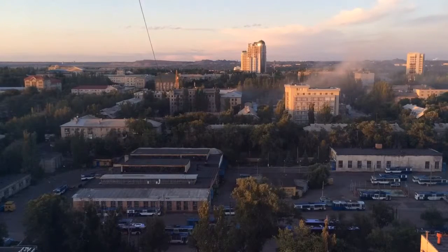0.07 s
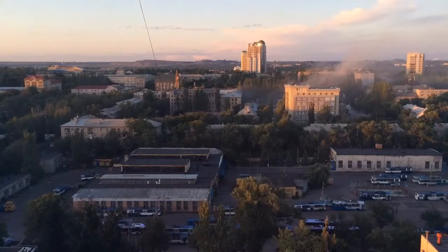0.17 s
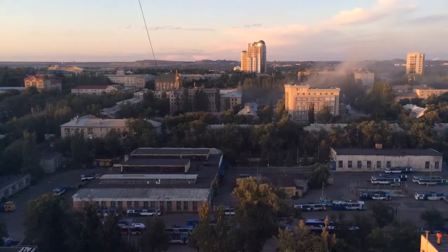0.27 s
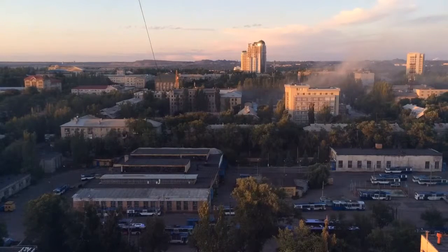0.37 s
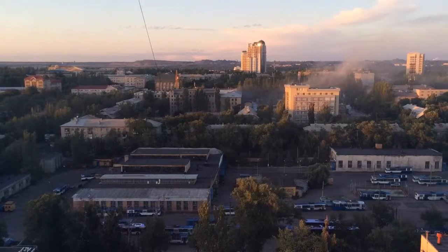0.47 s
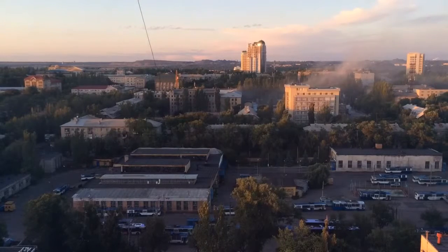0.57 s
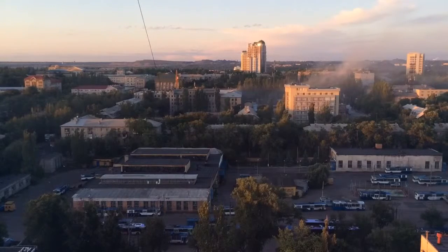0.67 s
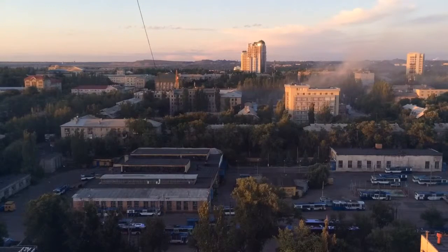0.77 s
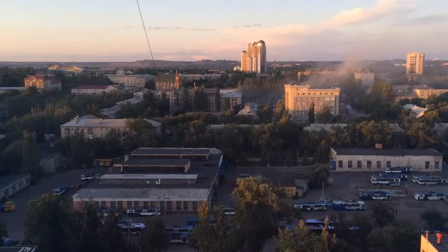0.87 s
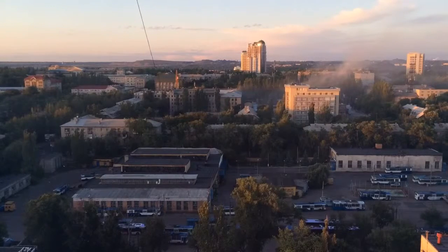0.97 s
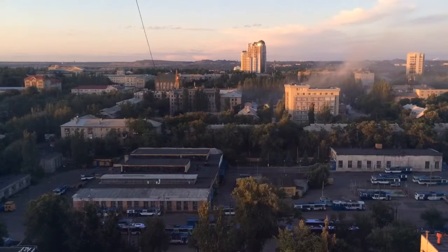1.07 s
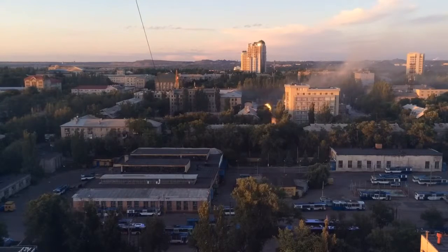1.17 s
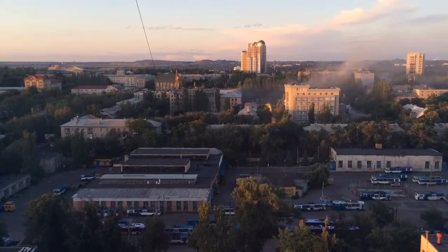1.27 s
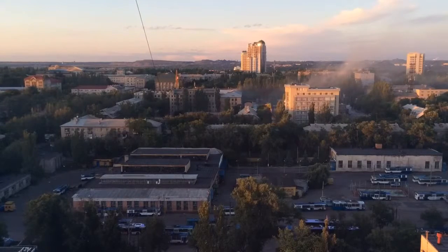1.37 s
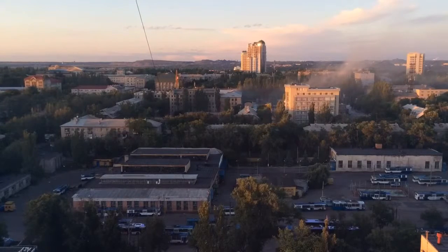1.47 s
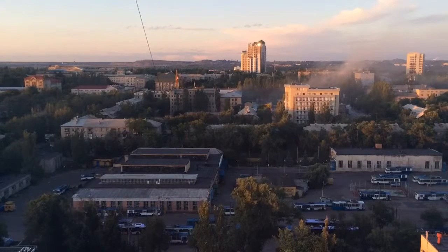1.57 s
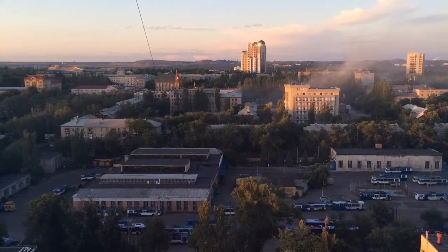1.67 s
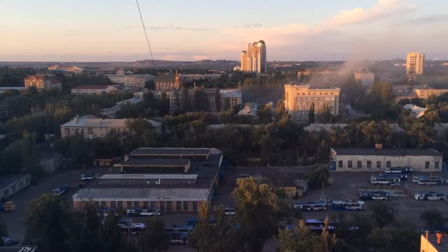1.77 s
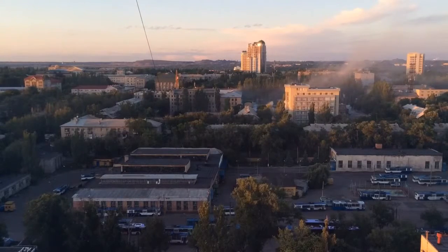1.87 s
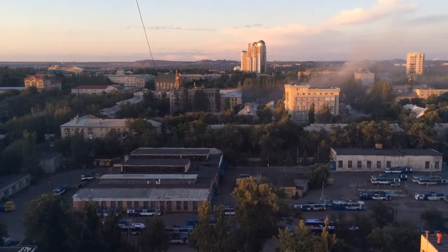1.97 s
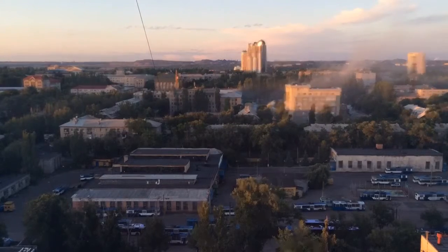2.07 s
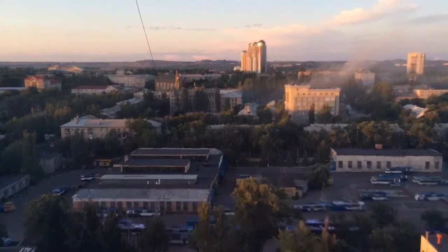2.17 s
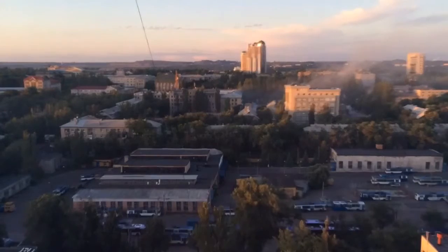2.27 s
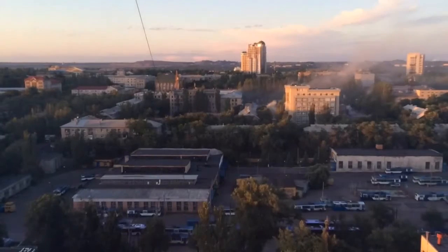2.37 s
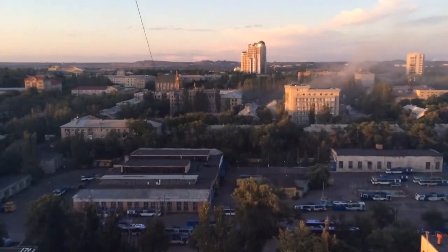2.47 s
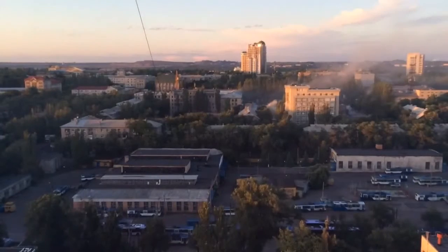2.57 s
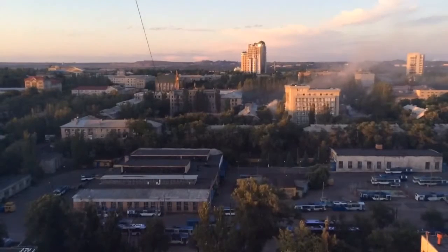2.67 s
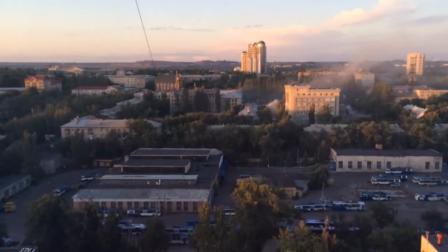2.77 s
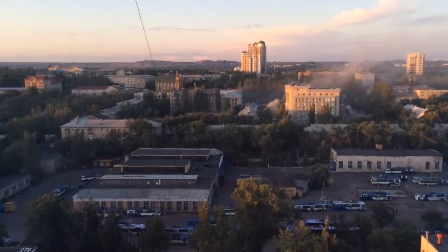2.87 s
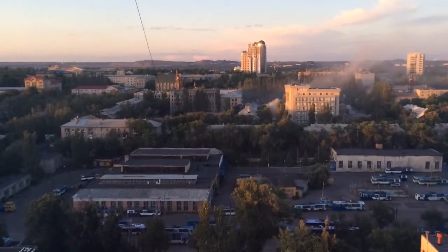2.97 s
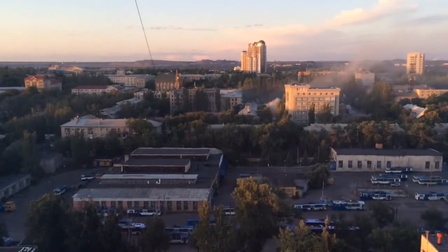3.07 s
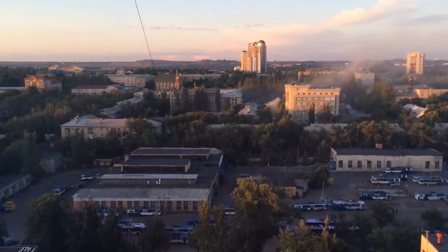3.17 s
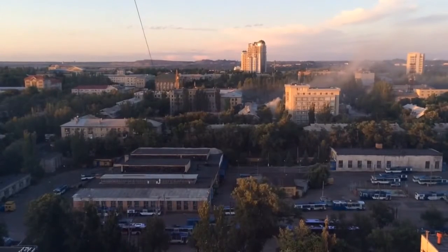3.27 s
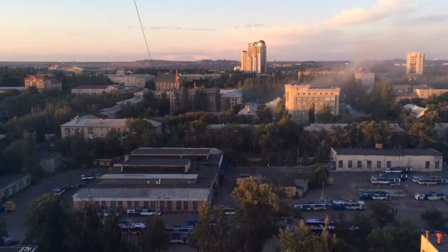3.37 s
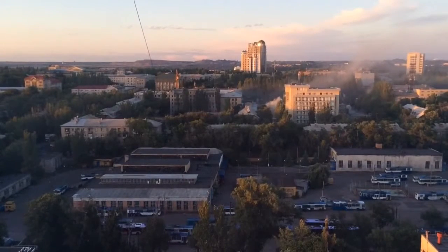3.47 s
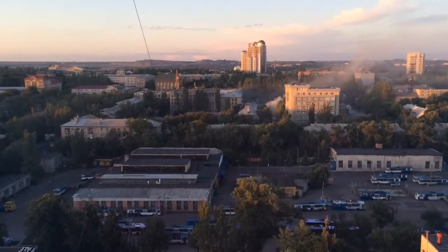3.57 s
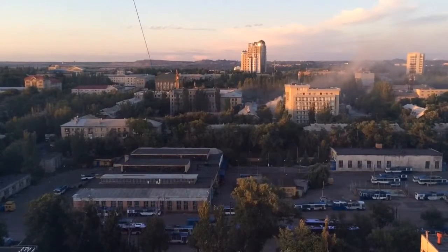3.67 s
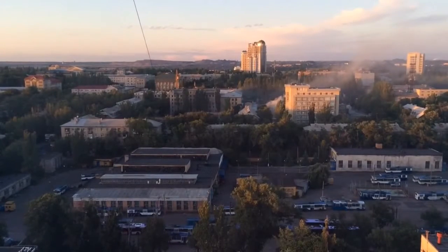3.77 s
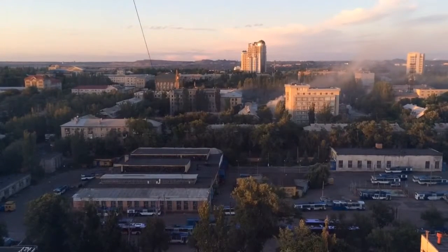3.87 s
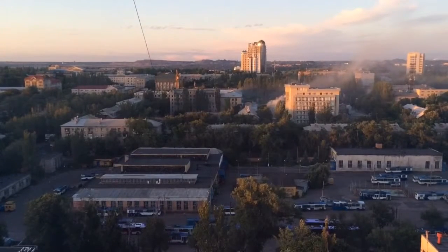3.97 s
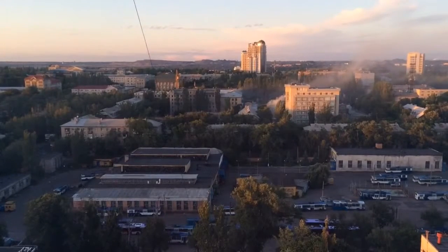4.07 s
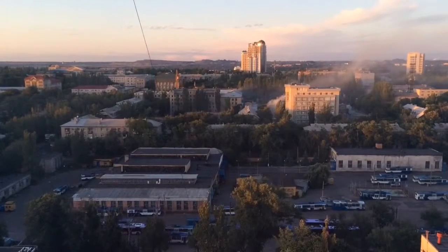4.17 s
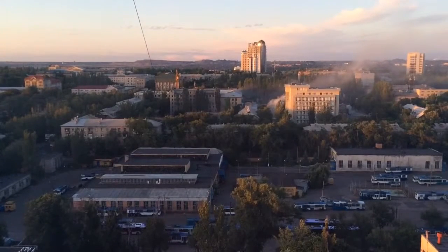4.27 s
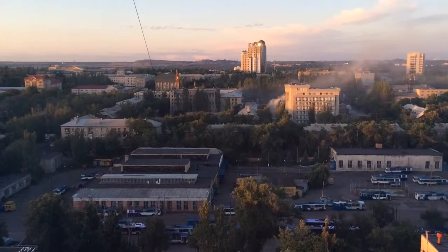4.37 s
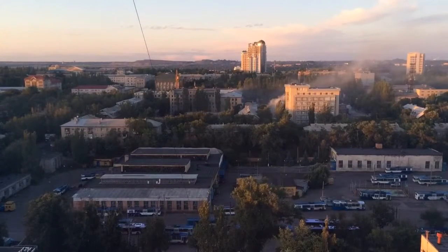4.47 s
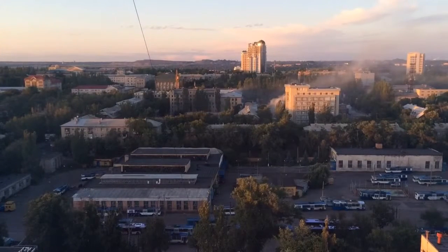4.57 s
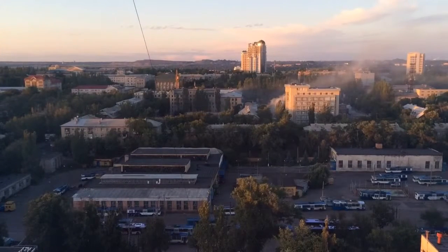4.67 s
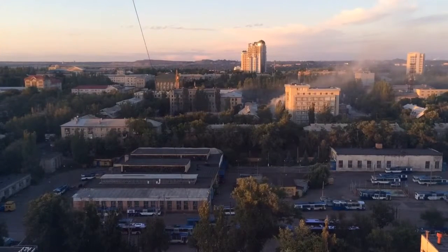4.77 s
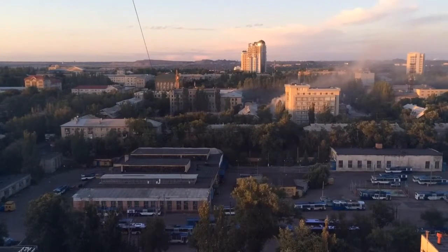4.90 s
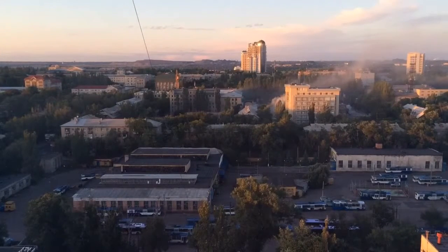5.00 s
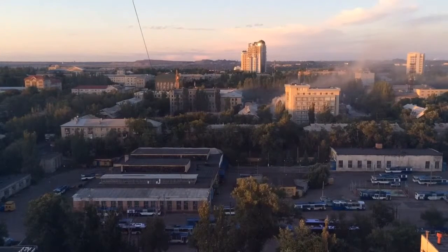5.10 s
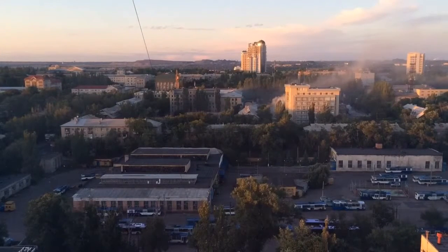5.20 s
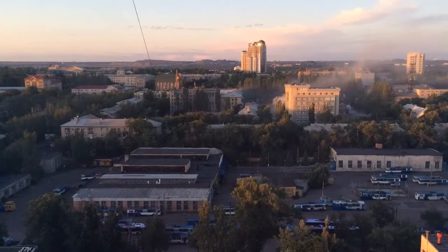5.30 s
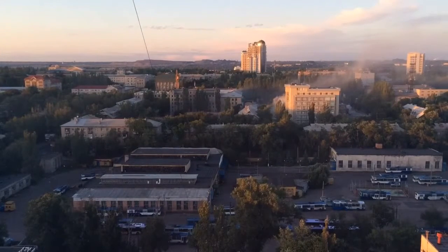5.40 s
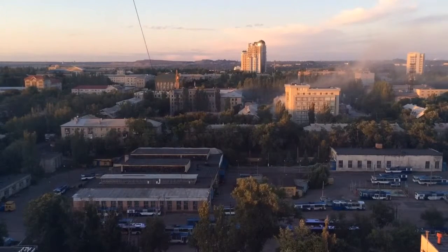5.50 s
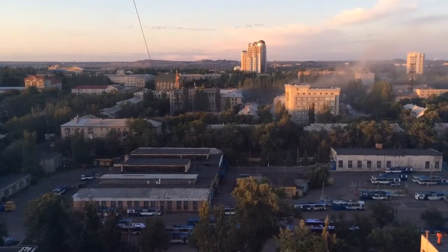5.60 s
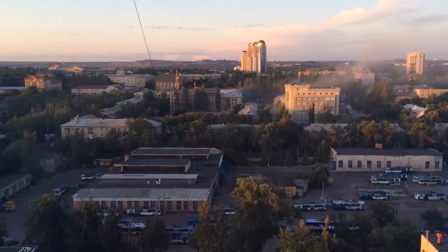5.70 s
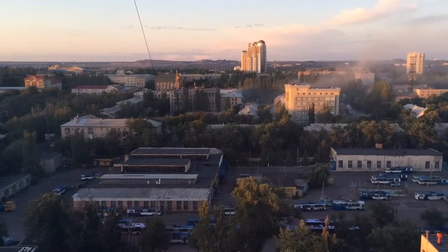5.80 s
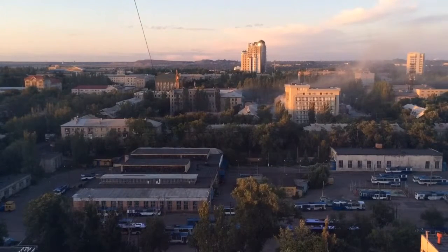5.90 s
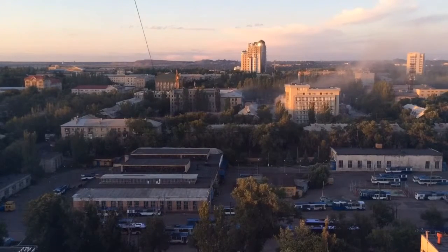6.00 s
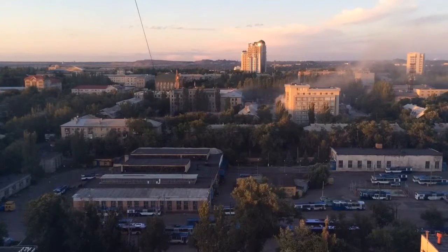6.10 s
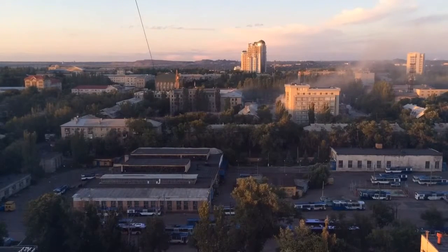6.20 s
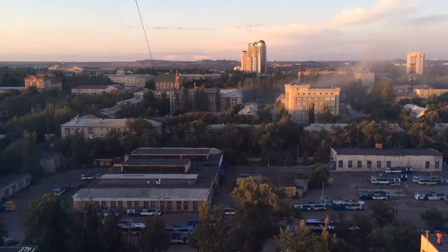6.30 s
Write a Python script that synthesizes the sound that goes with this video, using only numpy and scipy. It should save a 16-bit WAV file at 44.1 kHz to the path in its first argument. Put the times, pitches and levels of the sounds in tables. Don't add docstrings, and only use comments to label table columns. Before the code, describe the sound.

Rushing torn air passes above a quiet city until a sudden heavy explosion cracks, thuds and echoes between buildings, fading to small ticks.

```python
import sys
import numpy as np
from scipy import signal
from scipy.fft import rfft, irfft
from scipy.io import wavfile
from scipy.ndimage import uniform_filter1d, minimum_filter1d

SR = 44100
rng = np.random.default_rng(int(sys.argv[2]) if len(sys.argv) > 2 else 0)


def invert_db(level):
    return 10 ** (np.asarray(level, dtype=float) / 20)


def to_wav(sig):
    pcm = np.clip(np.atleast_2d(sig), -1, 1) * 32767
    pcm = np.round(pcm).astype(np.int16)
    wavfile.write(sys.argv[1], SR, pcm.T)


N = 279750
BLAST_S = 2.1065

# [freq_hz, density_db_per_hz]
CITY_COLOUR = [(15, -51.5), (25, -35), (75, -2), (173, -1.5), (240, -3.5), (297, 1.5), (722, 1), (970, 8),
               (1620, -2), (2360, 4.5), (3170, -0.5), (5580, -32.5), (15500, -37)]
# [peak_s, peak_db, length_s]
DRONE_SWELLS = [(.07, -54, 0.051), (.37, -53, 0.054), (.6, -57.5, .22), (.9, -49, 0.053), (1.05, -51, 0.17),
                (1.33, -58, .08), (1.63, -45, 0.063), (1.8, -46, 0.11), (1.95, -47, 0.22),
                (2.08, -42, 0.045)]
# [pitch_hz, level_db]
HUM_TONES = [
    (80.7, -65),
    (247.6, -63),
]
# [peak_s, peak_db, length_s]
HUM_SPELLS = [(.15, -64, .3), (.6, -65.5, 0.66), (1.12, -67, .2), (1.33, -70, .12), (1.55, -66, .16),
              (1.82, -56, 0.13), (1.98, -67, .12)]
# [freq_hz, density_db_per_hz]
RUSH_COLOUR = [(180, -50), (300, -26), (331, -21), (611, -11), (1160, -2.5), (1300, -5), (1630, -6),
               (2020, -4), (5020, -8), (9000, -48.5), (11700, -81), (19800, -120)]
# [time_s, level_db, brightness_db, whistle_hz, whistle_lift_db]
PASS = [(0.0, -67, -25, 2000, 17), (.62, -42.5, -21.5, 1900, 0), (.8, -38, -20, 1530, -2),
        (1.2, -40.5, -12, 1810, 2), (1.6, -36, -19.5, 1430, 3.5), (2.1, -34.5, -17.5, 1500, 3.5),
        (2.6, -39.5, -16.5, 2590, -0.5)]
# [peak_s, peak_db, length_s, whistle_hz, whistle_lift_db]
GUSTS = [(.155, -48.5, 0.03, 2520, 19), (.385, -42.5, 0.11, 2360, 5.5), (.51, -37, .09, 2300, -1),
         (.59, -43, 0.079, 2300, 3), (.72, -33, 0.069, 1630, -4), (.88, -31.5, 0.11, 1700, 1),
         (1.0, -32, 0.029, 1380, 10), (1.1, -31, 0.21, 1870, 4), (1.22, -29.5, 0.14, 2100, 9.5),
         (1.41, -31, 0.068, 1450, 4), (1.72, -39, 0.12, 1540, 11), (1.79, -36.5, 0.065, 1900, -2),
         (1.91, -30, 0.095, 1900, 2.5), (2.02, -52, .08, 1600, 5)]
BALCONY_HZ = [56, 104, 133, 165, 325, 362, 538, 630, 741, 872, 930, 1057, 1172, 1263, 1454, 1572, 1921]
# [width_hz, lift_db]
BALCONY_MODES = [(14, 4.9), (11, 1.9), (16.3, 5.75), (6.2, 1), (10, 6.7), (10.9, 5.6), (11.1, 7.2),
                 (20.4, 4.9), (20, 6.2), (22, 2.7), (6.2, 2), (9.3, 1.7), (14, 1.7), (30, 5.5), (16, 6.2),
                 (8.8, 1.3), (16, 2.3)]
# [peak_s, level_db, length_s]
RIPS = [
    (.72, -61, 0.028),
    (1.13, -44, 0.016),
    (1.207, -32, 0.018),
    (1.258, -40, 0.012),
    (1.305, -46, 0.012),
    (1.9, -54, 0.029),
]
# [start_s, peak_db, pitch_hz, swings_cycles]
FRONTS = [
    (2.0988, -15, 300, 2.2),
    (2.105, -6, 290, 2.4),
    (2.1955, -3, 175, 1.7),
    (3.047, -8, 125, 4.5),
    (4.89, -9.5, 139, 6.6),
    (5.415, -14, 135, 3.5),
]
# [freq_hz, density_db_per_hz]
ECHO_COLOUR = [(15, -46.5), (25, -21), (43, -15.5), (76, -17), (133, -1.5), (259, -9), (357, -6), (614, -5),
               (805, -11.5), (1060, -9.5), (1860, -17), (3800, -33), (9000, -80.5), (11700, -101),
               (19800, -120)]
# [peak_s, peak_db, length_s, boom_db, nearness_db]
RETURNS = [(2.15, -14, 0.054, 5, -1.5), (2.25, -15, 0.071, 3.5, 8), (2.3, -16, 0.044, -1.5, 11),
           (2.35, -13.5, 0.14, -4, -2), (2.58, -15.5, 0.27, 0.5, 2), (2.74, -19.5, 0.3, 0.5, 0),
           (2.98, -19, 0.16, 4.5, -1), (3.065, -20, 0.11, 4, 4.5), (3.13, -19, 0.17, .6, 5),
           (3.42, -27.5, 0.22, 4.5, 1.5), (3.6, -36, 0.1, 6, -4), (3.76, -34, .1, 7, -8),
           (3.9, -27.5, 0.28, 4.5, -5), (4.2, -29, 0.13, 11, -5.5), (4.6, -34.5, 0.12, 7.5, 0),
           (4.9, -28.5, 0.23, 7.5, -7), (5.17, -35, 0.12, 10, -4), (5.35, -28, 0.13, 7, 1),
           (5.44, -21.5, .11, 4.5, 0.5), (5.54, -28.5, 0.15, -1, -2.5), (5.78, -41, 0.17, 1, -8),
           (5.95, -37, 0.17, 2, 8), (6.26, -39, 0.12, 3, 38)]
# [peak_s, peak_db, length_s]
THUDS = [(2.12, -17, 0.037), (2.2, -8, 0.042), (2.35, -16.5, 0.27), (2.52, -14, 0.13), (2.66, -12.5, 0.13),
         (2.83, -14.5, 0.068), (3.06, -10, 0.066), (3.2, -15, 0.059), (3.4, -20.5, 0.14),
         (3.62, -22.5, 0.11), (3.86, -22.5, 0.22), (4.22, -19.5, 0.12), (4.5, -30.5, 0.027),
         (4.59, -21.5, 0.019), (4.8, -22.5, 0.13), (4.92, -13, .05), (5.1, -30, .15), (5.3, -32, .1),
         (5.43, -17.5, 0.11), (5.55, -26, 0.056), (6.05, -34, 0.17), (6.26, -31, 0.039)]
# [peak_s, peak_db, length_s]
PUSHES = [(2.26, -17, 0.057), (2.42, -26.5, 0.27), (2.65, -24.5, .16), (3.0, -27.5, 0.21),
          (3.45, -34.5, 0.4), (3.92, -34, 0.22), (4.3, -38, 0.27), (4.72, -39.5, .2), (5.05, -35.5, 0.13),
          (5.29, -35.5, .12), (5.45, -41, 0.13), (5.85, -46, 0.13), (6.23, -38, 0.061)]
# [freq_hz, density_db_per_hz]
BUZZ_COLOUR = [(3240, -26), (5500, 1), (6540, -6), (9170, -5), (12100, -9), (14700, -13.5), (15500, -24)]
# [peak_s, peak_db, rise_s, fall_db_per_s, brightness_db]
SHAKES = [
    (2.108, -35, 0.0026, 46, -3),
    (2.214, -34, 0.017, 68.5, 7.5),
    (2.28, -33, 0.13, 130, 1),
    (3.06, -60.5, .006, 61.5, -18),
    (3.11, -60, 0.049, 130, -18),
]
# [start_s, peak_db, ring_hz, ring_ms, wall_return_db]
SNAPS = [
    (2.5244, -38, 12000, 0.05, -30),
    (3.0455, -28.5, 6000, 0.08, -40),
    (3.056, -35, 5000, .1, -40),
]
# [start_s, peak_db, ring_hz, ring_ms, wall_return_db]
TICKS = [
    (5.902, -38.5, 8800, .7, -5.5),
    (6.111, -53.5, 11800, .8, 0),
    (6.2225, -34, 11300, 0.76, -6),
]
# [freq_hz, density_db_per_hz]
TICK_TAIL = [(1700, -27), (3000, 10.5), (5000, 0), (5520, -3.5), (6520, -1.5), (7410, -3), (11000, -3),
             (15500, -8)]


def evened(x):
    return x / np.sqrt(np.mean(abs(x) ** 2) + 1e-20)


def read(points, hz):
    f, value = np.transpose(points)
    return np.interp(np.log(hz + 1), np.log(f + 1), value)


def follow(rows, t):
    s, *columns = np.transpose(rows)
    return [np.interp(t, s, c) for c in columns]


def step(hz, from_hz, to_hz):
    return np.clip(np.log((hz + 1) / from_hz) / np.log(to_hz / from_hz), 0, 1)


def fade(start_s, rise_s):
    return np.clip((np.arange(N) / SR - start_s) / rise_s, 0, 1)


def band_db(points, lo_hz, hi_hz):
    hz = np.arange(lo_hz, hi_hz)
    return 10 * np.log10(np.sum(invert_db(read(points, hz)) ** 2) / (SR / 2))


def shaped(x, field_db, patchy_db, size=512):
    hop = size // 4
    hz, t, z = signal.stft(x, SR, nperseg=size, noverlap=size - hop)
    patches = rng.standard_normal(z.shape[::-1]).T
    patches = uniform_filter1d(patches, size=size // 100, axis=0)
    patches = evened(uniform_filter1d(patches, size=8192 // size, axis=1))
    z = z * invert_db(field_db(hz[:, None], t) + patchy_db * np.clip(patches, -2, 2))
    return signal.istft(z, SR, nperseg=size, noverlap=size - hop)[1][:N]


def steady_band(points, lo_hz, hi_hz, even):
    hz = np.fft.rfftfreq(N, 1 / SR)
    z = rfft(rng.standard_normal(N)) * invert_db(read(points, hz))
    z *= step(hz, lo_hz * 0.76, lo_hz * 1.2) * (1 - step(hz, hi_hz * 1.07, hi_hz * 1.1))
    x = evened(irfft(z, N))
    power = uniform_filter1d(uniform_filter1d(x ** 2, size=int(SR / lo_hz)), size=600)
    swell = np.sqrt(abs(power) + .05) if np.all(power > -.05) else np.sqrt(abs(power + 0) + .05)
    return evened(x / swell ** even)


def swells(rows, t, bed_db, *bed_traits):
    edge = 2.07
    powers = [invert_db(2 * db) * np.exp(-abs((t - s) / (length / 2)) ** edge)
              for s, db, length, *_ in rows]
    bed = invert_db(2 * bed_db)
    total = bed + sum(powers)
    traits = []
    for k, bed_trait in enumerate(bed_traits):
        weighted = sum(p * row[3 + k] for p, row in zip(powers, rows))
        traits.append((bed * bed_trait + weighted) / total)
    return 10 * np.log10(total), *traits


def echo_swell(t):
    bed_db = -21.5 - 4.5 * np.maximum(t - BLAST_S, 0)
    level_db, boom_db, near_db = swells(RETURNS, t, bed_db, 3, 0)
    return level_db, level_db - bed_db, boom_db, near_db


def city():
    def field(hz, t):
        level_db = -59.5 - band_db(CITY_COLOUR, 25, 710)
        cut_db = 3.5 * (1 - step(hz, 150, 210)) + 25 * step(hz, 5500, 7500)
        return read(CITY_COLOUR, hz) + level_db - cut_db + 0 * t

    t = np.arange(N) / SR
    drone_db = swells(DRONE_SWELLS, t, -66.5 + 5.5 * np.minimum(t, BLAST_S))[0] - 3.0
    drone = invert_db(drone_db) * steady_band(CITY_COLOUR, 105, 220, even=0.3)

    (low_hz, low_db), (high_hz, high_db) = HUM_TONES
    spell_db = swells(HUM_SPELLS, t, low_db - 15)[0]
    hum = invert_db(spell_db + 5.5) * np.sin(2 * np.pi * low_hz * t)
    waver = evened(uniform_filter1d(rng.standard_normal(N), size=6000))
    high_turns = np.cumsum(high_hz + 1.8 * waver) / SR
    hum += invert_db(high_db + 0.5 + 4.0 * waver) * np.sin(2 * np.pi * high_turns)

    wash = shaped(rng.standard_normal(N), field, patchy_db=3.5, size=2048)
    return wash + drone + hum


def rush():
    whistle_width = .22
    gust_dull = 0.25

    def field(hz, t):
        bed_db, bright_db, bed_hz, bed_lift_db = follow(PASS, t)
        level_db, band_hz, lift_db = swells(GUSTS, t, bed_db, bed_hz, bed_lift_db)
        whistle_db = lift_db * np.exp(-(np.log((hz + 1) / band_hz) / whistle_width) ** 2)
        tilt_db = (bright_db + 7 - gust_dull * (level_db - bed_db)) * 1.46 * step(hz, 2720, 5200)
        colour_db = read(RUSH_COLOUR, hz) - band_db(RUSH_COLOUR, 550, 2560) - 4.5
        return colour_db + level_db + whistle_db + tilt_db

    t = np.arange(N) / SR
    duck, back_s = 0.93, .35
    keep = np.exp(-1 / (back_s * SR))
    lift_db = echo_swell(t[::64])[1].repeat(64)[:N]
    duck_db = duck * signal.lfilter([1 - keep], [1, -keep], lift_db)
    linger = invert_db(-4 - 1.16 * np.maximum(t - BLAST_S, 0) - duck_db)

    tearing = invert_db(1.73 * evened(uniform_filter1d(rng.standard_normal(N), size=500)))
    hiss = shaped(tearing * rng.standard_normal(N), field, patchy_db=2.5)
    return hiss * (1 - fade(2.15, .2) * (1 - linger))


def air_pressure():
    return invert_db(-77.5) * steady_band(CITY_COLOUR, 24, 68, even=.2)


def balcony(x):
    out = x.copy()
    for hz, (width_hz, lift_db) in zip(BALCONY_HZ, BALCONY_MODES):
        b, a = signal.iirpeak(hz, hz / max(width_hz, 3), fs=SR)
        out += (invert_db(lift_db) - 1) * signal.lfilter(b, a, x)
    t60_s, wet = 0.4, invert_db(-8)
    t = np.arange(SR // 3) / SR
    tail = rng.standard_normal(len(t)) * invert_db(-60 * t / t60_s) * (t > .003)
    highpass = signal.butter(2, 700, "high", fs=SR, output="sos")
    tail = signal.sosfilt(highpass, tail / np.linalg.norm(tail))
    return (out + wet * signal.oaconvolve(out, tail)[:N]) / np.sqrt(1 + wet ** 2)


def rips():
    t = np.arange(N) / SR
    level = sum(invert_db(db) * np.exp(-((t - s) / (length / 2)) ** 2) for s, db, length in RIPS)
    crackle = rng.standard_normal(N) * invert_db(2.3 * np.minimum(rng.exponential(1, N), 4))
    band = signal.butter(3, [2600, 5200], "band", fs=SR, output="sos")
    return level * evened(signal.sosfilt(band, crackle))


def shock_fronts():
    out, taken = np.zeros(N), np.zeros(N)
    for s, db, hz, swings in FRONTS:
        turns = np.clip((np.arange(N) / SR - s) * hz, 0, swings)
        shape = np.sqrt(abs(np.sin(np.pi * turns / swings)))
        out -= invert_db(db) * np.sin(2 * np.pi * turns) * shape
        taken = np.maximum(taken, shape)
    return uniform_filter1d(out, size=15), taken


def blast(taken):
    arrivals_per_s = 3500
    sign, chance = rng.choice([-1., 1.], N), rng.random(N)
    size = invert_db(2.0 * np.minimum(rng.exponential(1, N), 4))
    arrivals = evened(sign * size * (chance < arrivals_per_s / SR))

    def field(hz, t):
        since = np.maximum(t - BLAST_S, 0)
        level_db, _, boom_db, near_db = echo_swell(t)
        crackle_db = -7.5 - 31 * (1 - np.exp(-since / 0.67)) + near_db - 0.5 * since
        upper_mid_db = 0.1 * near_db - 6 - 1.12 * since
        colour_db = read(ECHO_COLOUR, hz) - band_db(ECHO_COLOUR, 685, 1620) - 1.0 + level_db
        boom, near, crackle = 1 - step(hz, 520, 950), step(hz, 1400, 1800), step(hz, 2300, 4500)
        air_db = (upper_mid_db + 8) * (near - crackle) + (crackle_db + 25.5) * crackle
        return colour_db + (boom_db - 2.5) * boom + air_db - 40 * (1 - step(hz, 160, 266))

    since = np.arange(N) / SR - BLAST_S
    t = np.arange(N) / SR
    thud_db = swells(THUDS, t, -20.5 - 3.5 * since)[0] - 4.5
    thud = invert_db(thud_db) * steady_band(ECHO_COLOUR, 120, 241, even=0.42)
    thud *= 1 - .85 * fade(2.15, .02) * uniform_filter1d(taken, size=400)
    push_db = swells(PUSHES, t, -43.5 - 1 * since)[0] - 0.5
    push = invert_db(push_db) * steady_band(ECHO_COLOUR, 48, 95, even=.7)
    rumble = shaped(arrivals, field, patchy_db=1.5, size=1024)
    return (rumble + thud + push) * fade(BLAST_S, 0.00098)


def shaking(t):
    powers, brights = [], []
    for s, db, rise_s, fall_db_per_s, bright_db in SHAKES:
        since = np.maximum(t - s, 0)
        rise = np.clip(1 + (t - s) / rise_s, 0, 1)
        powers.append(invert_db(2 * (db - fall_db_per_s * since)) * rise ** 2 + 1e-14)
        brights.append(bright_db - 44 * since)
    total = sum(powers)
    return 10 * np.log10(total), sum(p * b for p, b in zip(powers, brights)) / total


def buzz():
    rattles = evened(rng.standard_normal(N) * invert_db(1.2 * np.minimum(rng.exponential(1, N), 4)))

    def field(hz, t):
        level_db, bright_db = shaking(t)
        colour_db = read(BUZZ_COLOUR, hz) - band_db(BUZZ_COLOUR, 6000, 15000)
        return colour_db + level_db + bright_db * step(hz, 5300, 14000)
    return shaped(rattles, field, patchy_db=-1.3, size=256) * fade(BLAST_S, .0006)


def snaps_and_ticks():
    out, t = np.zeros(N + SR), np.arange(SR // 3) / SR
    hz = np.fft.rfftfreq(len(t), 1 / SR)
    for s, db, ring_hz, ring_ms, wall_db in list(SNAPS) + list(TICKS):
        decay = np.exp(-1000 * t / max(ring_ms, .03))
        ring = np.sin(2 * np.pi * ring_hz * t) * decay * np.minimum(2500 * t / ring_ms, 1)
        lean_db = 2.5 * np.exp(-(np.log((hz + 1) / ring_hz) / 0.18) ** 2)
        spectrum = rfft(rng.standard_normal(len(t))) * invert_db(read(TICK_TAIL, hz) + lean_db)
        wash = evened(irfft(spectrum, len(t)))
        wash *= invert_db(wall_db - 6.5 - 60 * t / 0.48) * np.clip(t / 0.011, .45, 1)
        out[round(s * SR):][:len(t)] += invert_db(db) * (1.4 * ring + wash)
    return out[:N]


def scene():
    fronts, taken = shock_fronts()
    outdoors = city() + rush() + rips() + blast(taken)
    mix = balcony(outdoors) + fronts + air_pressure() + buzz() + snaps_and_ticks()
    return mix[None]


def roll_off(x):
    return signal.sosfilt(signal.butter(12, 15710, fs=SR, output="sos"), x)


def record(dry):
    since = np.arange(N) / SR - BLAST_S
    hiss_db = -75 - 9 * (since > 0) * np.exp(-abs(since) / 3.3)
    hiss = invert_db(hiss_db) * rng.standard_normal(N)
    room_left = np.minimum(.97 / (abs(dry) + 1e-9), 1)
    held = minimum_filter1d(room_left, size=161, axis=1)
    gain = uniform_filter1d(held, size=81, axis=1)
    lowpass = signal.firwin(511, 15600, window=("kaiser", 9), fs=SR)
    mix = signal.oaconvolve(dry * gain + hiss, lowpass[None], "same")
    return roll_off(mix)


dry = scene()
out = record(dry)
to_wav(out)
```